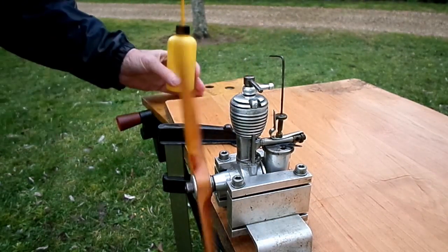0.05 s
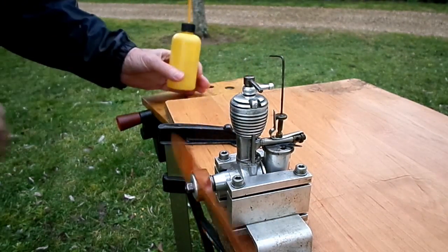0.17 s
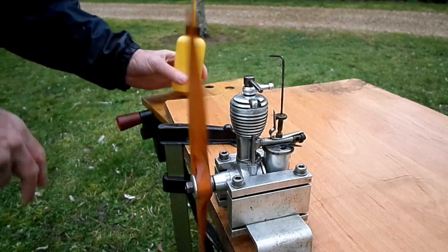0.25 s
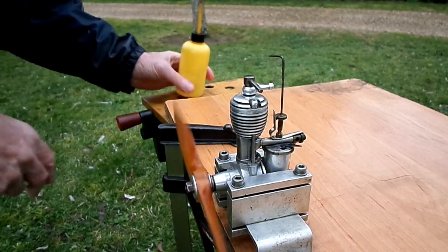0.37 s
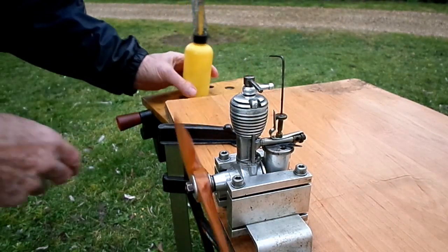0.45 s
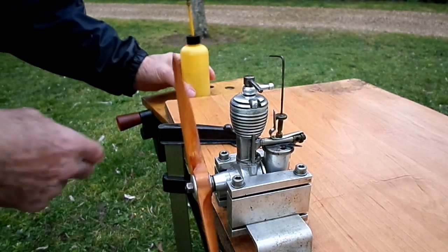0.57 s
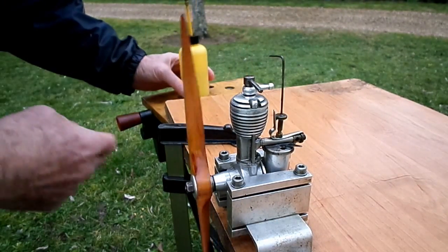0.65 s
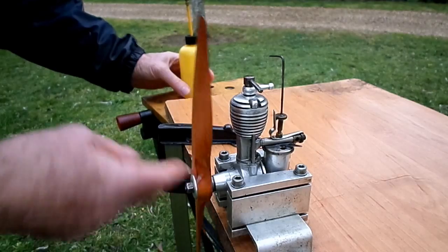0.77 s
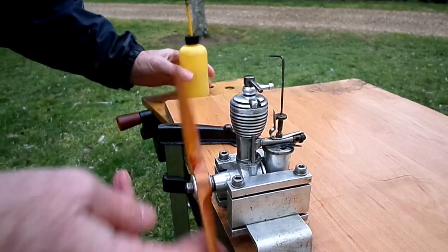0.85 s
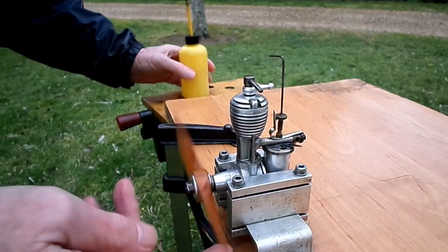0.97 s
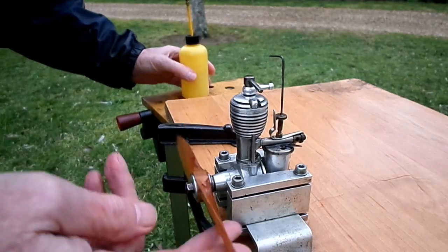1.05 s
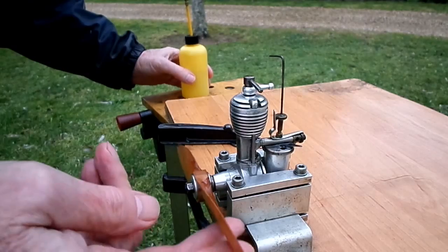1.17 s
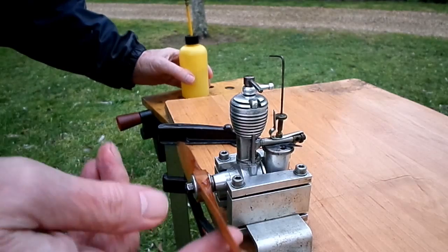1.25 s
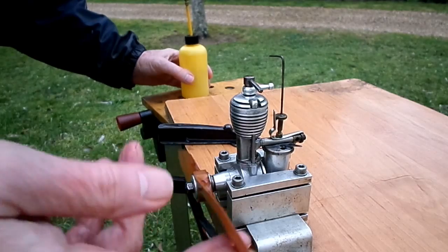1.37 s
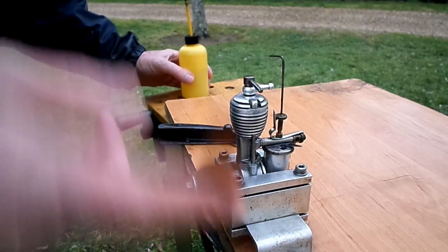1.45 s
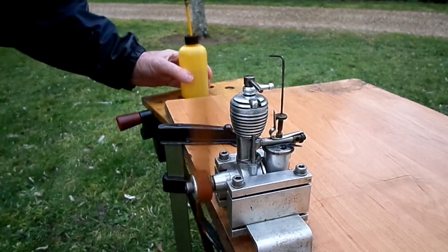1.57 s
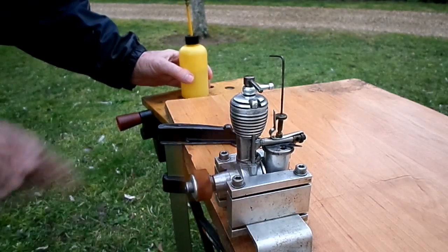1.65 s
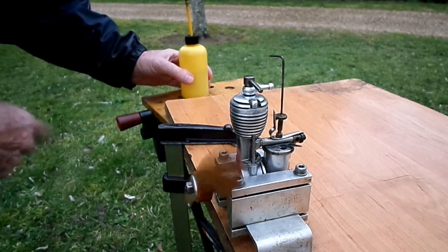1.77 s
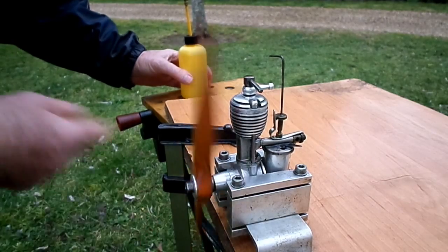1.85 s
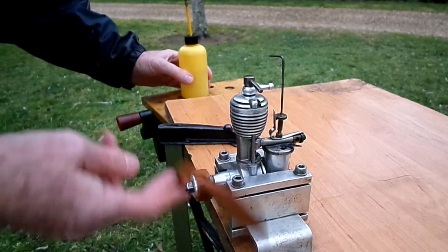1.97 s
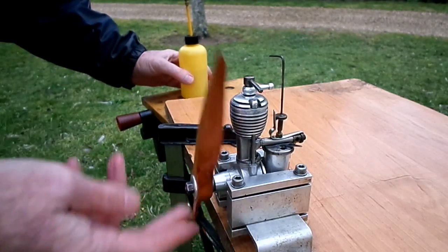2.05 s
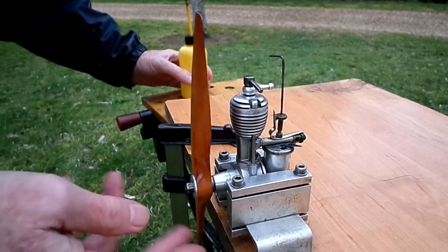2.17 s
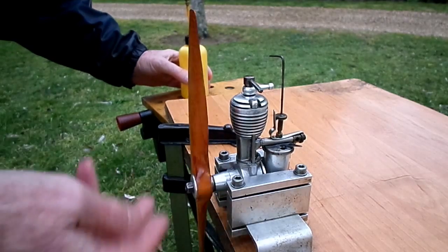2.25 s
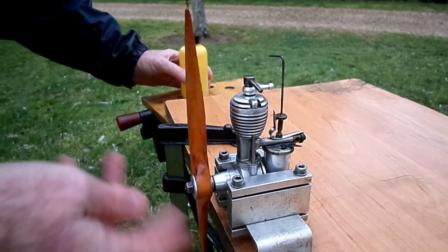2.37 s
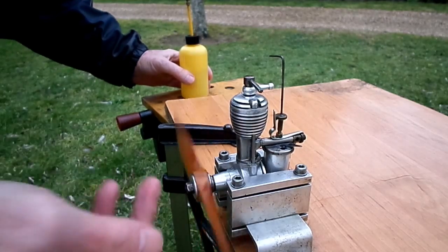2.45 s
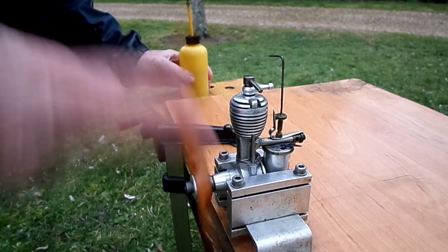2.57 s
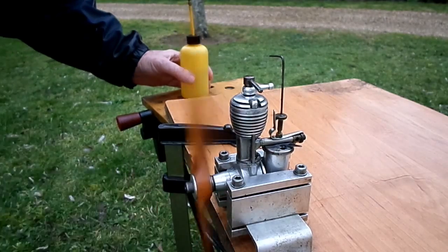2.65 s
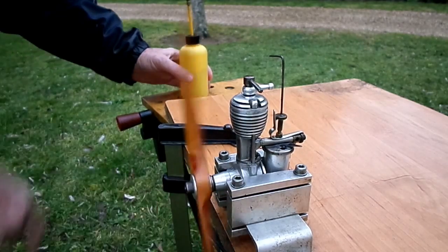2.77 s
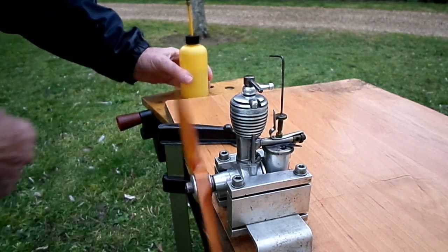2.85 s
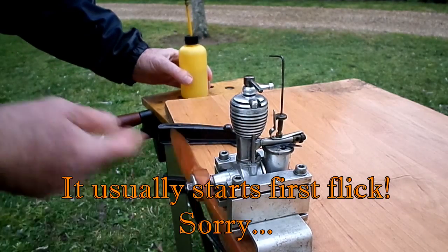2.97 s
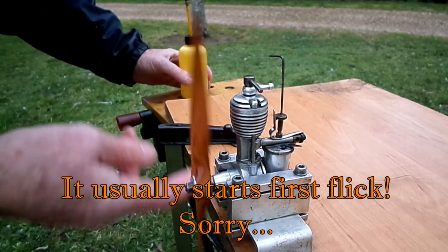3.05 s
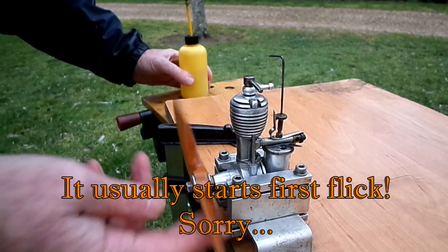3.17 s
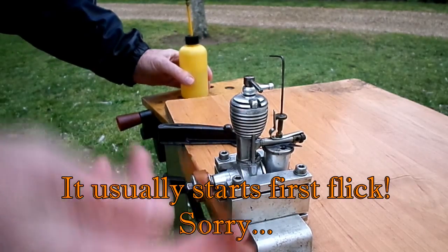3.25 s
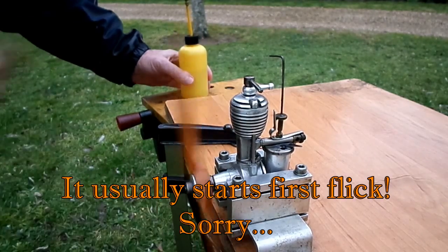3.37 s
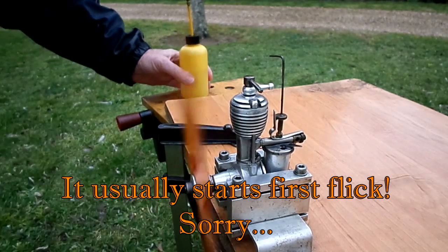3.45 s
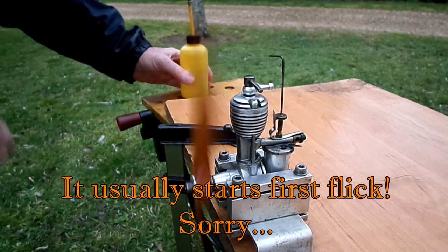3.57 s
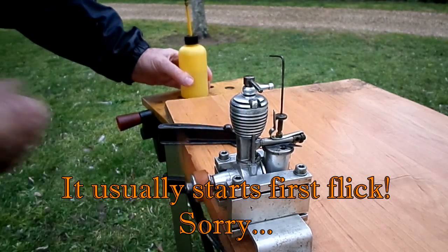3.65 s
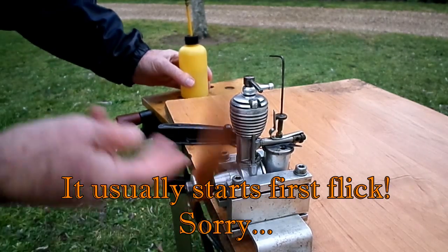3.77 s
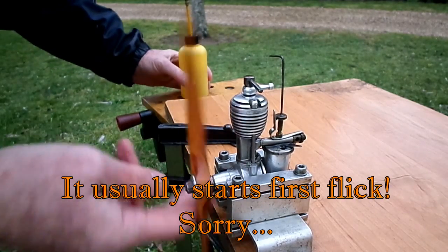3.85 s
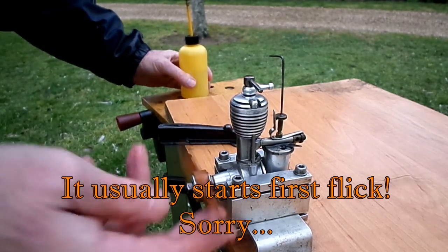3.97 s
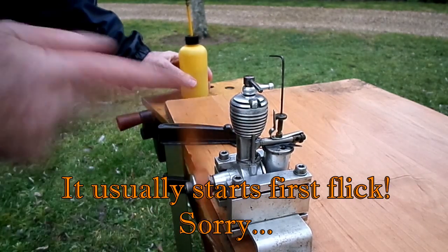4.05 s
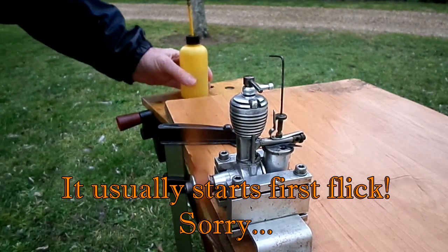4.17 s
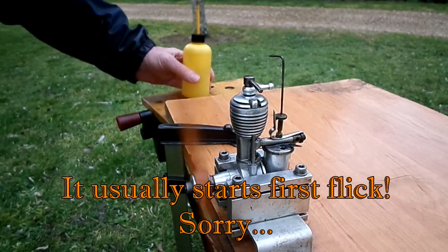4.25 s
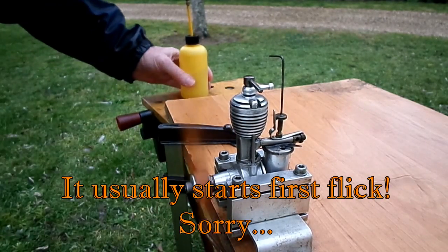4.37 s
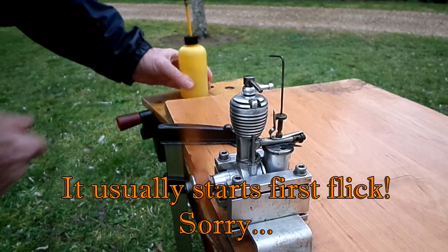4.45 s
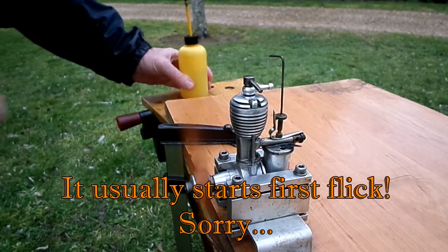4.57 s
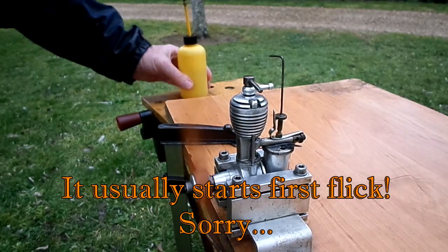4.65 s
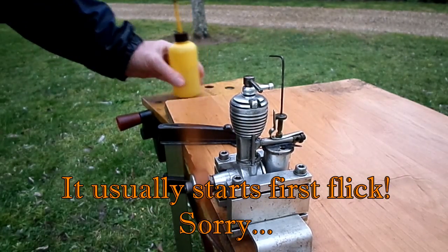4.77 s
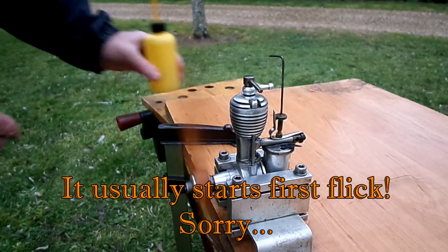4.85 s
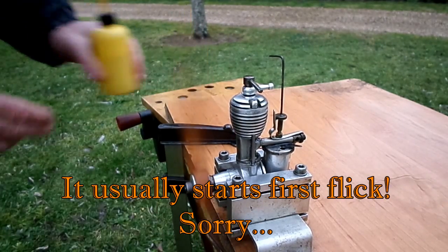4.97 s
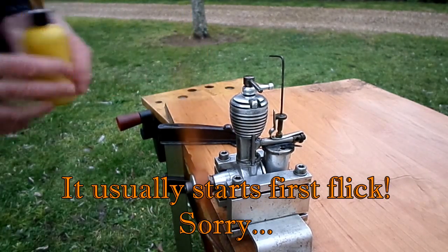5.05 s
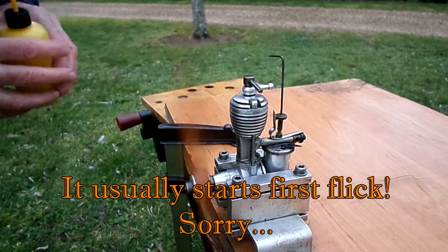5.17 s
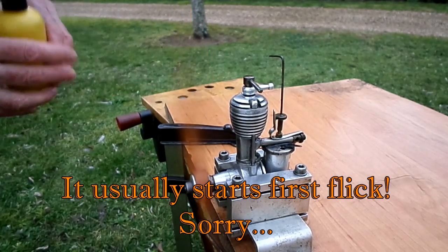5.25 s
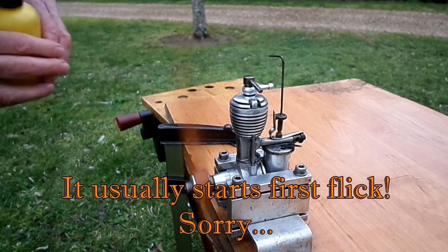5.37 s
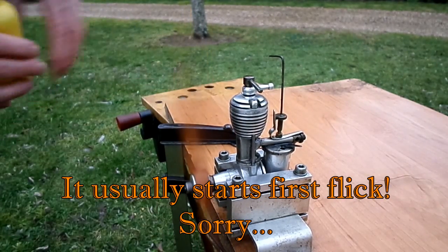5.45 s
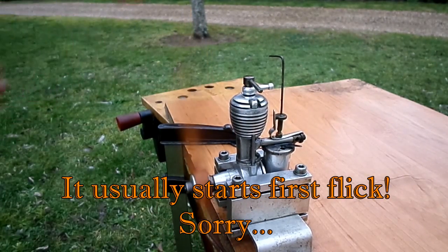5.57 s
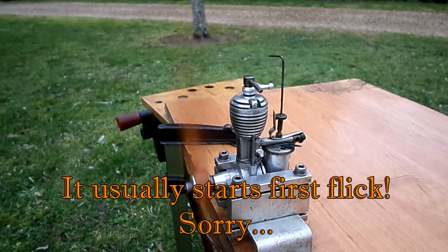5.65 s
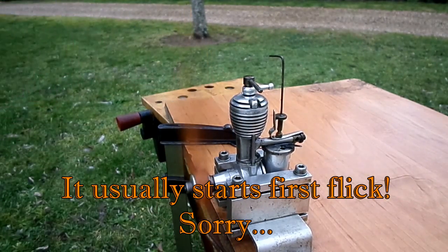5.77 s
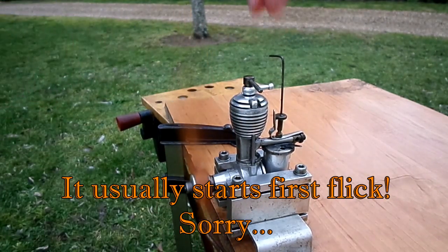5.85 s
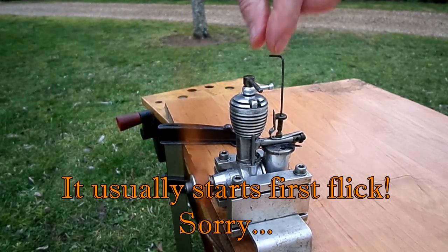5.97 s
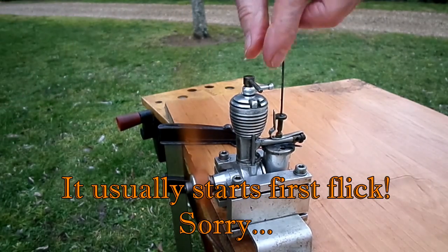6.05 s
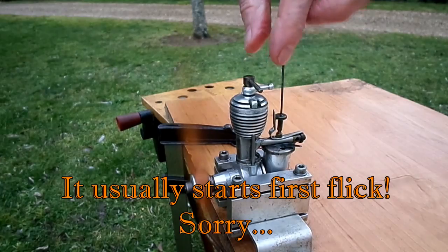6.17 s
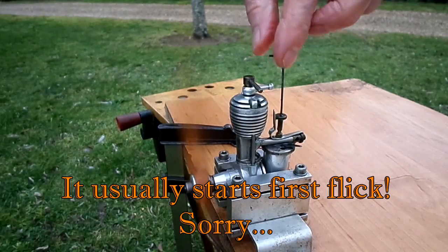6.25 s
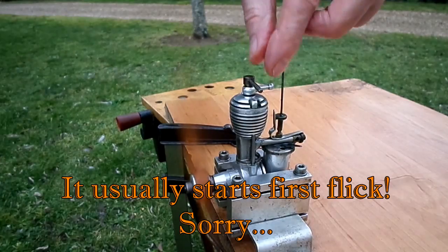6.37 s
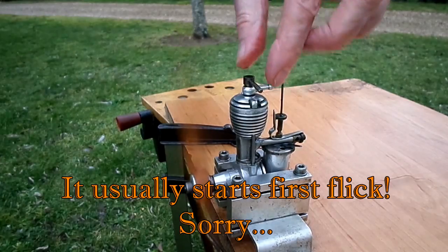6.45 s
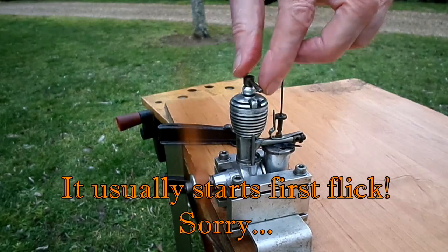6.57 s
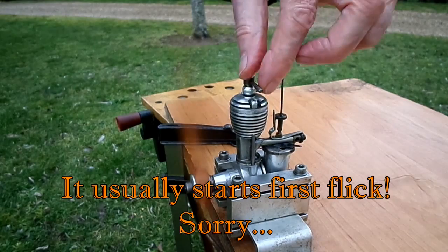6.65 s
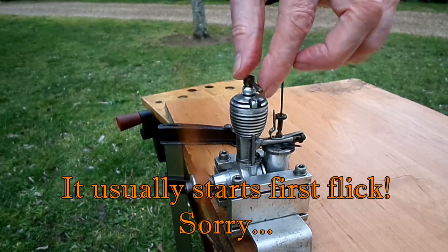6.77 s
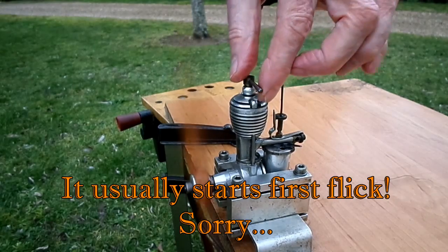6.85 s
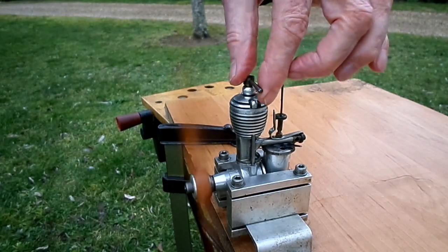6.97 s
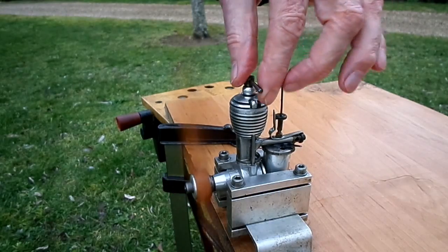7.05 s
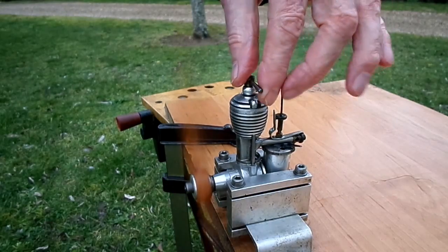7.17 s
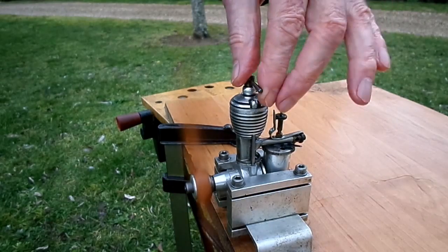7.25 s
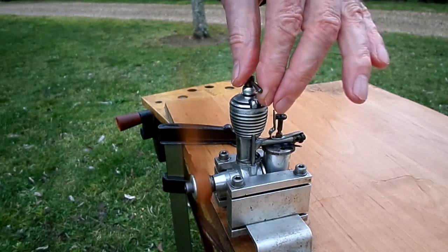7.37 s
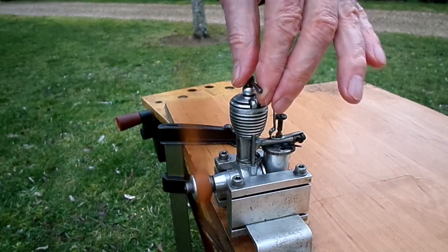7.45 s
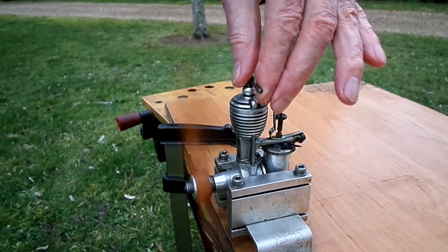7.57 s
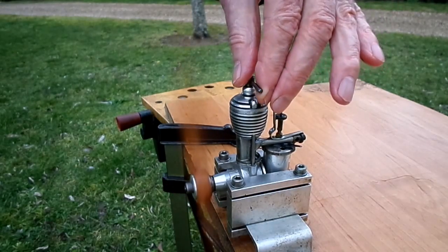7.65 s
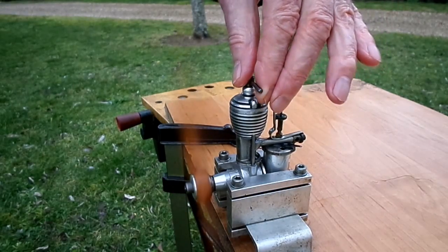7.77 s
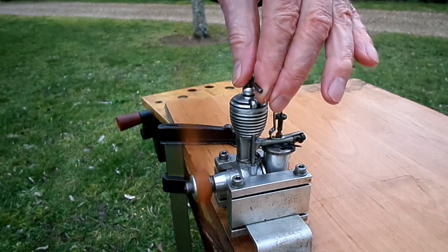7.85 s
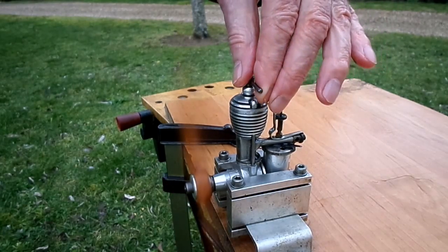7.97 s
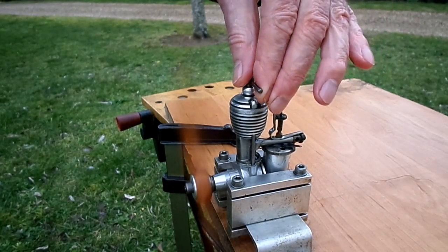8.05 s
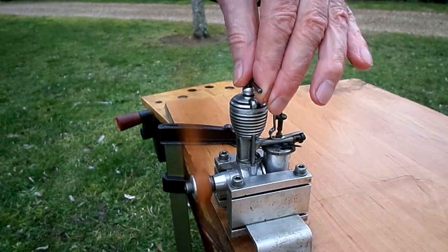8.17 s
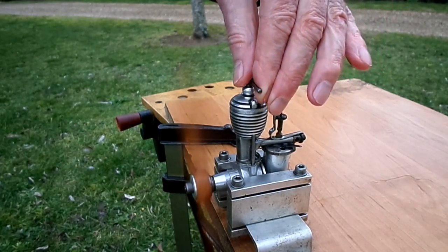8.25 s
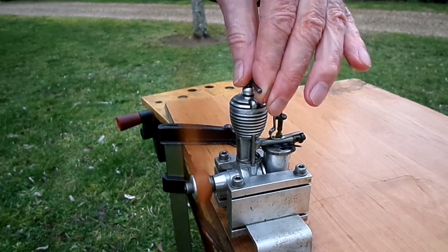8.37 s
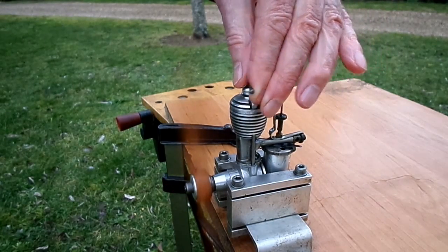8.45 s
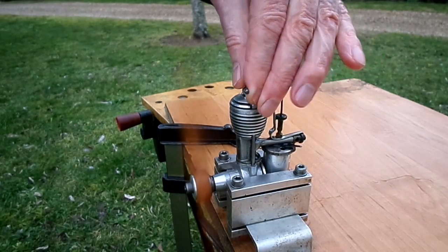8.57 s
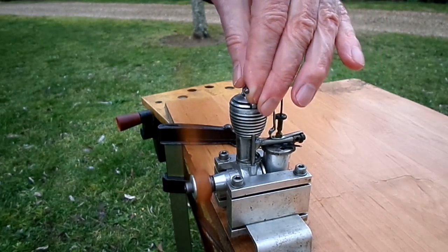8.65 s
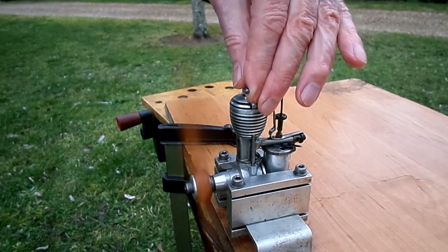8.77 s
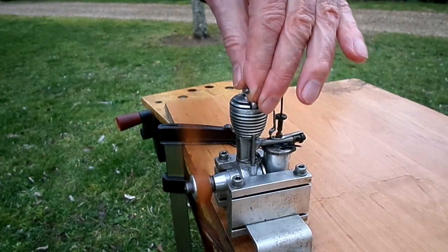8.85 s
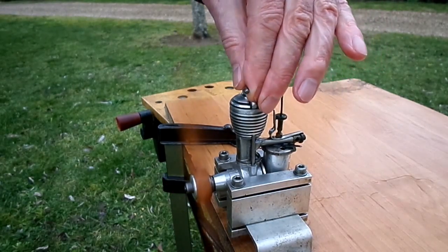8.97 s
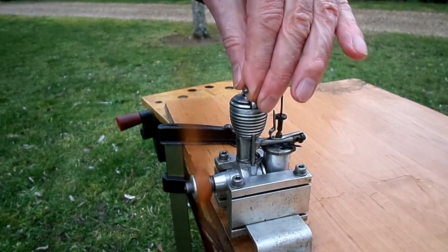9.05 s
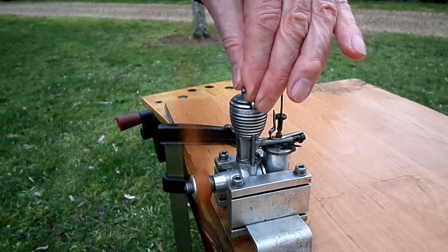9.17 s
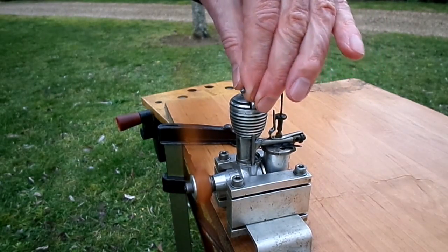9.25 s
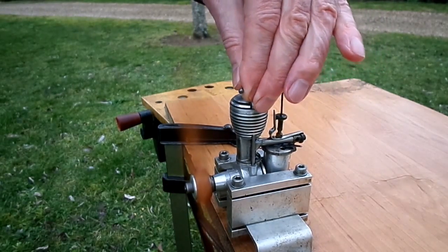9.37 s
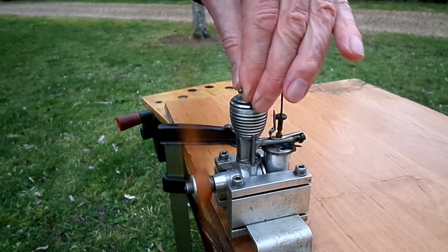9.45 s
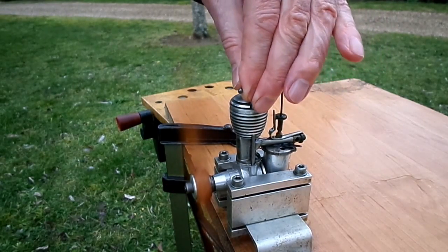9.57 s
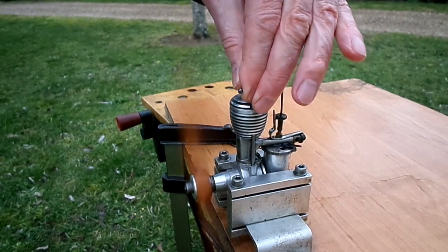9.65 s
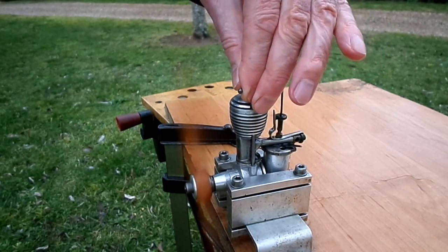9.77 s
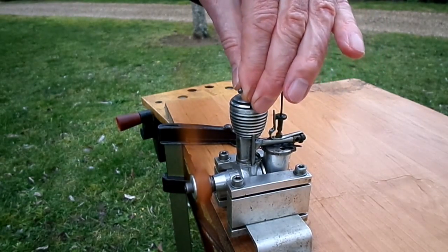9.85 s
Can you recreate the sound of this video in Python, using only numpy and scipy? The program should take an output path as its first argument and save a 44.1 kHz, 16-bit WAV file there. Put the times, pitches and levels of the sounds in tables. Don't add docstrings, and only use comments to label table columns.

```python
import sys
import numpy as np
from scipy import signal
from scipy.fft import rfft, irfft, next_fast_len
from scipy.io import wavfile
from scipy.ndimage import uniform_filter1d, map_coordinates

SR = 44100
rng = np.random.default_rng(int(sys.argv[2]) if len(sys.argv) > 2 else 0)


def unload_wav(signal):
    wavfile.write(
        sys.argv[1],
        SR,
        np.round(np.clip(np.atleast_2d(signal).T, -1, 1) * 32767).astype(np.int16),
    )


def gain_from_db(level_db):
    decades = np.asarray(level_db, float) / 20
    return 10 ** decades


N = 436590
TIME = np.arange(N) / SR

# t/s, speed/(turns per s)
SPEED = [(4.386, 41.33), (4.45, 51.6), (4.534, 73.08), (4.75, 82.32), (5.1, 90.5), (5.4, 95.21),
         (5.8, 95.39), (6.3, 93.54), (6.8, 96.3), (7.2, 89.28), (7.6, 93.37), (8.0, 91.51), (8.3, 87.95),
         (8.7, 96.35), (9.1, 94.13), (9.4, 98.44), (9.9, 99.45)]
# from/s, to/s, blast lost/dB, extra level of the firing that relights/dB
MISFIRES = [(4.755, 4.802, -16, 7.5), (5.812, 5.812, 0, 9.5), (6.108, 6.108, -8, 2.5),
            (6.383, 6.392, -21, 9), (6.584, 6.62, -8, 8), (6.788, 6.815, -6, 4), (6.914, 6.942, -21, 4),
            (7.169, 7.185, -3, 4), (7.268, 7.272, -10, -1), (7.296, 7.34, -20, 6.5),
            (7.368, 7.388, -8, 1.5), (7.42, 7.436, -15, 2.5), (7.455, 7.466, -15, 6),
            (7.642, 7.654, -7, 11), (7.671, 7.7, -15, 5), (7.911, 7.919, -9, 23), (7.953, 7.972, -21, 4),
            (8.005, 8.004, -3, -3), (8.078, 8.087, -11, 5), (8.15, 8.168, -16, 7.5), (8.25, 8.278, -27, 3),
            (8.404, 8.45, -20, 7), (8.807, 8.834, -17, 7.5), (9.132, 9.158, -7, 13.5),
            (9.169, 9.193, -5, 5), (9.629, 9.644, -11, 6.5), (9.88, 9.889, -17, 3)]
# t/s, blast/dB, ring/dB, hiss/dB
POPS = [
    (1.588, -17, -21, -20),
    (1.653, -31, -25, -19),
    (2.6567, -22, -18.5, -14.5),
    (3.4525, -22.5, -23.5, -17),
    (3.398, -19, -12, -15),
    (4.1374, -10, -3, -15),
    (4.171, -7, -12, -9),
    (4.197, -17.5, -11, -14),
    (4.2647, -11.5, -9, -13.5),
    (4.2971, -11, -6, -10),
]
# f/Hz, width/Hz, level/dB
CASTING = [(3050, 370, 7), (4550, 570, -11), (5060, 530, -2.5)]
# f/Hz, width/Hz, level/dB
ROD = [(780, 350, 14.5), (2320, 1200, -1), (5280, 460, 7.5), (7570, 300, 5.5)]
# f/Hz, width/Hz, level/dB
FINS = [(3467, 130, 2), (5730, 95, 6)]
# f/Hz, level/(dB per Hz)
JET = [(2650, -11), (4500, -7.5), (5930, -4), (6390, -17.5), (7850, -2), (8510, -1.5), (9180, -2),
       (11000, 4.5), (14800, -14), (15700, -31), (16400, -56)]


def running():
    # t/s, exhaust blast/dB
    burn = [(4.37, -4), (4.5, -1), (4.6, -8), (4.75, -7.5), (5.0, -8), (5.3, -10.5), (6.3, -9), (6.48, -13),
            (6.66, -8), (6.9, -10), (7.15, -11), (7.5, -9), (7.9, -11.5), (8.3, -15.5), (8.7, -10.5),
            (9.1, -10), (9.4, -12), (9.9, -9.5)]
    # t/s, fin ring/dB, fourth blade multiple/dB
    grip = [
        (4.4, -2, 0.5),
        (5.0, -17, -1),
        (5.5, 0, -2.5),
        (6.3, -12, -4),
        (7.0, -1, -5.5),
        (7.8, 0, -3),
        (8.6, 1, -1.5),
        (9.2, 3.5, 1.5),
        (9.9, 1, 1.5),
    ]
    spin, sag, near = crank()
    burn_db = curves(burn)[0]
    fin_db, fourth_db = curves(grip)
    wash_db = -14.5 - 10.5 + 0.65 * (burn_db + 13.0) - 0.23 * sag - 0.5 * near

    turns = np.cumsum(spin) / SR
    whole = np.arange(int(turns[-1]) + 1)
    s = np.interp(whole, turns, TIME) - .0005 + .00002 * rng.standard_normal(len(whole))
    s[0] = SPEED[0][0] - .0008
    period = 1 / np.interp(s, TIME, np.maximum(spin, 30))

    lost, clank = misfiring(s)
    scatter = rng.standard_normal((len(s), 3))
    blast_db = np.interp(s, TIME, burn_db - 0.39 * sag)
    hiss_db = np.interp(s, TIME, wash_db)
    size_db = blast_db + 1.15 * lost - .3 * np.maximum(lost, 0) + .9 * scatter[:, 0]

    blast = exhaust(s + 0.000414, size_db - 11.5)
    boom_db = size_db - 22 - 22 * np.clip(s - 4.9, 0, 1)
    blast += through(train(s + 0.00043, boom_db), modes([(823, 190, 0)]))

    on = np.clip((TIME - 4.3) / 0.18, 0, 1)
    wash = on * gain_from_db(wash_db + 3.8 * wobble(40))
    gas = port_gas(s, period, size_db, hiss_db, lost, scatter, wash)
    ring = head_ring(s, size_db, blast_db, hiss_db, fin_db, lost, scatter, wash)
    slack = rod_slack(s, period, blast_db + clank)
    return blast + ring + slack + gas + blade_hum(spin, sag, burn_db, turns, fourth_db)


def crank():
    sags = [17.5, 9.4, 3.8, 7.2, 14.1, 8.4, 2.0, 9.0, -1.0, 9.3, -2.9, 2.4, 2.3, 12.7, 0.7, 5.5, 5.1, 0.0,
            -0.6, 5.4, 0.1, 9.6, 2.9, 12.7, 1.3, 5.7, 0.1]
    early_s, late_s, recover_s, flare_s = .008, .005, .15, .055
    t = TIME[::32]
    sag, near = np.zeros(len(t)), np.zeros(len(t))
    for (start, end, *_), lost in zip(MISFIRES, sags):
        begin, stop = start - early_s, end + late_s
        fall = np.clip((t - begin) / (stop - begin), 0, 1)
        sag += lost * fall * np.exp(-np.maximum(t - stop, 0) / recover_s)
        near = np.maximum(near, (t < start) * np.exp(-np.abs(start - t) / flare_s))
    sag, near = np.interp(TIME, t, sag), np.interp(TIME, t, near)
    return (curves(SPEED)[0] - sag) * (TIME >= SPEED[0][0]), sag, near


def misfiring(s):
    # t/s, lost/dB, gain of the next one/dB
    weak = [
        (6.713, -5, 1.5),
        (7.034, -27, 2),
        (7.136, -21, 5),
        (7.147, 8, -2),
        (7.632, -2, 0),
        (7.824, -2, 2.5),
        (7.926, -3, -0.5),
        (8.047, -13, 5),
        (9.028, -32, 4),
        (9.405, -2, 0),
    ]
    cold_db, warm_db, warm_s = -3.5, -13.5, 0.11
    lost = np.zeros(len(s))
    clank = warm_db + (cold_db - warm_db) * np.exp(-((s - s[0]) / warm_s) ** 2)
    for start, end, lost_db, bang_db in MISFIRES:
        relight = np.searchsorted(s, end)
        lost[(s > start) & (s < end)] = lost_db
        lost[relight] = bang_db
        clank[relight] = .6 * bang_db - 4
    for at, lost_db, next_db in weak:
        k = np.argmin(np.abs(s - at))
        lost[k:k + 2] = lost_db, lost[k + 1] + next_db
    return lost, clank


def exhaust(s, db):
    # f/Hz, width/Hz, level/dB
    stub = [(1412, 1830, -1.3), (2274, 650, 0), (3197, 150, -13.5), (3945, 270, -4.3), (600, 200, -22),
            (946, 580, -5.9)]
    # delay/ms, share at each of path_s (minus = inverted)
    bounces = [(0, 1, 1, 1, 1), (.278, .57, .51, .57, .52), (.636, -.1, -.23, -.22, -.34),
               (.805, -.34, -.48, -.41, -.53), (1.025, .02, -.34, -.19, -.3), (1.21, .21, -.11, -.06, -.11),
               (1.392, .15, .03, .19, .16), (1.735, .2, .22, .26, .31), (1.833, -.25, -.22, -.2, -.33),
               (2.402, .18, .2, .27, .37), (2.667, .06, .12, .13, .19)]
    path_s = [4.7, 5.3, 7.0, 9.0]
    stray = .045 * rng.standard_normal((len(s), len(bounces)))
    paths = np.zeros(N)
    for k, (ms, *shares) in enumerate(bounces):
        paths += train(s + ms / 1000, db, np.interp(s, path_s, shares) + stray[:, k])
    return filtered(through(paths, modes(stub)), lambda hz: hz ** 6 / (hz ** 6 + 494.0 ** 6))


def port_gas(s, period, size_db, hiss_db, lost, scatter, wash):
    # f/Hz, level/(dB per Hz)
    churning = [(150, -0.5), (300, 2.5), (600, -1.5), (2000, 3), (4200, -2), (6500, -59), (9000, -48)]
    hiss = gust(s, hiss_db - 3.5 + 0.04 * lost + 2.2 * scatter[:, 1], rise=0.00065, t60=0.02)
    hiss += gust(s + 0.78 * period, hiss_db - 25 + 1.5 * scatter[:, 2], rise=0.00036, t60=0.024)
    churn = gust(s, size_db - 35, rise=.0007, t60=.012)
    jet = (hiss + gain_from_db(-22) * wash) * patchy(noise(JET), depth_db=1.6)
    return jet + (churn + gain_from_db(-18) * wash) * noise(churning)


def head_ring(s, size_db, blast_db, hiss_db, fin_db, lost, scatter, wash):
    # f/Hz, width/Hz, level/dB
    treble = [(8150, 870, -6), (9340, 410, -1), (10800, 180, 11)]
    sharper_db = 1.14 * np.maximum(lost, 0)
    ring = gust(s, hiss_db - 14 + 1.8 * scatter[:, 2], rise=0.00047, t60=.014) * rattle(CASTING)
    ring += through(train(s, size_db - 31 + np.interp(s, TIME, fin_db)), modes(FINS[1:]))
    ring += gain_from_db(fin_db - 22.0) * wash * rattle(FINS[1:])
    ring += through(train(s + 0.000842, blast_db - 28.0 + 1.8 * scatter[:, 1]), modes(FINS[:1]))
    edge = modes([(4900, 2400, -33.0), (5430, 260, 23.0), (6500, 1700, 14.0)])
    ring += through(train(s + 0.000514, size_db - 50.0 + sharper_db), edge)
    treble_db = hiss_db - 8.5 + sharper_db + 0.25 * lost + 0.42 * scatter[:, 0]
    return ring + reflected(through(train(s + 0.000511, treble_db), modes(treble)))


def rod_slack(s, period, db):
    # t/s, level/dB
    clanks = [(6.4129, -20), (6.639, -17.5), (7.204, -18), (7.4799, -18.5), (7.663, -12.5), (7.9817, -18),
              (8.1827, -23), (8.845, -22), (9.045, -17), (9.078, -19), (9.1659, -15)]
    late = (s + .68 * period)[:-1]
    slack = gust(late, (db - 16)[:-1], rise=.0012, t60=.022) * rattle(ROD)
    clank_s, clank_db = np.transpose(clanks)
    return slack + gust(clank_s, clank_db - 7.5, rise=0.00032, t60=0.015) * rattle(ROD[2:])


def blade_hum(spin, sag, burn_db, turns, fourth_db):
    # multiple of crank speed, level/dB
    blades = [(1, -13), (2, 8), (3, -12.5), (4, -2), (6, 2.5)]
    catch_s, catch_speed = 4.13, 32.2
    hum_db = -38 + 0.94 * np.minimum(burn_db + 8.0, 4.5)
    hum_db += 20 * 2.2 * np.log10(np.maximum(spin, 70) / 90)
    hum_db += -0.47 * sag - 5.5 * (spin == 0)
    angle = turns + catch_speed * np.minimum(TIME - SPEED[0][0], 0) + 0.283
    hum = np.zeros(N)
    for k, db in blades:
        level = gain_from_db(db + (k == 4) * fourth_db + 1.2 * wobble(8.0))
        level *= (np.maximum(spin, 80) / 90) ** (1.46 * (k % 5 - 2))
        hum += level * np.cos(2 * np.pi * k * angle)
    fade_in = np.clip((TIME - catch_s) / 0.018, 0, 1)
    return np.sqrt(2) * fade_in * gain_from_db(uniform_filter1d(hum_db, size=1500)) * hum


def flicking():
    # f/Hz, width/Hz, level/dB
    cold_exhaust = [(840, 360, 9.5), (2260, 260, 6.5), (3100, 700, 4), (4200, 310, 4)]
    # t/s, level/dB
    squeaks = [
        (2.628, -36),
        (2.686, -27),
        (2.772, -39),
        (3.4935, -29),
        (4.212, -26),
        (4.247, -30),
        (4.34, -29),
    ]
    # t/s, level/dB
    cold_knocks = [
        (4.161, -11),
        (4.289, -12.5),
        (4.378, -26),
        (4.403, -24),
    ]
    # t/s, level/dB
    snaps = [
        (1.62, -25),
        (1.5555, -33),
    ]
    s, thump_db, blast_db, ring_db, hiss_db = turned_over()
    fired = np.isin(s, np.transpose(POPS)[0, 4:])

    thump = through(train(s, thump_db + 3.5), modes([(266, 200, 17.4), (707, 850, 3.6)]))
    bang = train(s[fired] + 0.000967, blast_db[fired] + 0.49)
    bang = reflected(through(bang, modes(cold_exhaust)))
    pop = train(s[~fired] + 0.00141, blast_db[~fired] - 7.5)
    pop = lows_first(through(pop, modes([(704, 960, 7.0), (2390, 480, 4.0)])))
    hiss = gust(s - .0008, hiss_db - 3.5, rise=0.0017, t60=0.016) * noise(JET)

    slack = gust(s, blast_db - 9.0 - 8 * fired, rise=0.000092, t60=0.034) * rattle(ROD[:2])
    cold_rod = rattle([(875, 104, 7.5), (2180, 120, 1.5), (5150, 470, -7)])
    slack += gust(*np.transpose(cold_knocks), rise=0.0017, t60=0.016) * cold_rod
    slack += through(train(*np.transpose(snaps)), modes([(5600, 2900, -4.0), (6740, 500, -3)]))

    ring = gust(s + 0.00034, ring_db - 7.0 - 8 * fired, rise=0.00095, t60=0.019) * rattle(CASTING)
    fin_db = ring_db - 3 - 20 * fired - 10 * (blast_db > ring_db - 5) - 6 * (ring_db < hiss_db - 6)
    ring += through(train(s + 0.000794, fin_db), modes(FINS))
    ring += through(train(s[fired] + 0.00074, ring_db[fired] - 24), modes([(3220, 180, 0)]))
    ring += through(train(*np.transpose(squeaks)), modes([(6550, 230, 0.5)]))
    return thump + bang + pop + slack + ring + hiss


def turned_over():
    # t/s, hiss/dB, thump/dB
    puffs = [(0.0168, -32.5, -44), (0.039, -36, -65), (0.8788, -41.5, -48), (1.048, -37.5, -55),
             (1.555, -31, -53), (1.5737, -32, -43), (1.592, -19.5, -48), (1.6188, -21, -37),
             (1.7077, -32, -51), (2.019, -37, -71), (2.0241, -21.5, -71), (2.1952, -43, -59),
             (2.449, -48, -84), (2.5937, -36, -47), (2.6292, -27, -40), (2.644, -31, -54),
             (2.685, -23, -32.5), (2.7717, -31, -41.5), (2.807, -30, -43), (3.3173, -38, -61),
             (3.368, -30, -44), (3.3858, -22, -42), (3.421, -19, -32), (3.49, -26, -38), (3.688, -37, -48),
             (3.897, -33.5, -47), (3.914, -41, -52), (3.962, -45, -55), (4.0441, -31.5, -57)]
    # t/s, ring/dB, hiss/dB
    clinks = [(0.1115, -29.5, -25.5), (0.185, -48, -57), (0.286, -44, -38), (0.558, -49, -44.5),
              (1.748, -33.5, -33), (1.8752, -30.5, -26), (2.107, -48, -46), (2.7208, -19, -21),
              (2.929, -31, -25.5), (3.0924, -46, -40.5), (3.5266, -24.5, -23.5), (3.557, -56, -53),
              (3.59, -42, -39), (3.625, -39, -33.5), (3.755, -32.5, -28.5)]
    # t/s, level/dB
    taps = [(0.2731, -58), (0.4815, -39.5), (0.546, -60), (0.8572, -45), (0.9686, -39), (1.5795, -39),
            (1.647, -37), (3.4305, -28), (2.0247, -43), (2.083, -41.5), (3.8537, -18.5), (3.882, -44)]
    # t/s, hiss/dB, blast/dB
    catching = [(4.129, -21, -35), (4.1555, -16, -39), (4.184, -18, -28), (4.212, -21, -33),
                (4.2267, -16, -21), (4.247, -19, -42), (4.283, -21, -43), (4.311, -21, -25),
                (4.3234, -13, -18.5), (4.339, -22, -41), (4.354, -22, -25), (4.371, -18, -40)]
    rows = [(s, thump, thump - 23, hiss - 12, hiss) for s, hiss, thump in puffs]
    rows += [(s, ring - 17.5, ring - 9, ring, hiss) for s, ring, hiss in clinks]
    rows += [(s, db - 14, db, db - 20, db - 25) for s, db in taps]
    rows += [(s, -30, blast, ring, hiss) for s, blast, ring, hiss in POPS]
    rows += [(s, hiss - 15, blast, hiss - 13, hiss) for s, hiss, blast in catching]
    return np.transpose(rows)


def bench():
    # t/s, level/dB, hardness/(dB per octave)
    knocks = [
        (0.016, -42, 8),
        (0.8788, -43.5, -8),
        (2.0252, -45.5, 7),
        (3.8548, -35.5, 0),
    ]
    # f/Hz, level/dB, t60/s
    wood = [(331, 3.5, 0.19), (400, 2, 0.093), (510, 0, 0.12), (597, -10, 0.11), (762, 14.5, 0.038),
            (1000, -35, 0.027), (1230, -37, 0.04)]
    # t/s, level/dB
    ticks = [
        (0.274, -45.5),
        (0.5452, -49),
        (2.0804, -46.5),
        (3.092, -45),
        (3.879, -46),
    ]
    s, db, hard_db = np.transpose(knocks)
    t, out = np.arange(SR // 5) / SR, np.zeros(N)
    for hz, level_db, t60 in wood:
        ring = gain_from_db(level_db - 60 * t / t60) * np.sin(2 * np.pi * hz * t)
        out += through(train(s, db + hard_db * np.log2(hz / 600)), ring)
    thud = gust(s, db - 6.5, rise=0.0021, t60=0.086) * rattle([(450, 290, -12), (1110, 340, 0)])
    return out + thud + through(train(*np.transpose(ticks)), modes([(2310, 180, 0)]))


def air():
    # t/s, level/dB
    calm = [
        (0, -48),
        (4.05, -48),
        (4.7, -84),
        (9.9, -65),
    ]
    # t/s, level/dB, half width/s
    gusts = [
        (0, -56, 0.17),
        (1.02, -35.5, 0.081),
        (1.25, -36.5, 0.094),
        (2.0, -49, 0.11),
        (2.67, -47, 0.029),
        (3.548, -39, 0.03),
        (4.2, -44, 0.065),
    ]
    # f/Hz, level/(dB per Hz)
    rumble = [(12, -52), (20, 3.5), (66, -6), (216, -31), (242, -41), (300, -31), (390, -57), (660, -120)]
    # from/s, peak/s, to/s, swish/dB
    sweeps = [(0, 0.034, 0.2, -58), (1.495, 1.564, 1.74, -42), (1.724, 1.884, 2.3, -57.5),
              (2.04, 2.087, 1.75, -46), (1.992, 2.042, 2.1, -55), (2.436, 2.484, 2.5, -53),
              (2.573, 2.632, 2.79, -38.5), (2.767, 2.875, 3.25, -52), (3.324, 3.384, 3.47, -39),
              (3.422, 3.445, 3.567, -35.5), (3.576, 3.627, 3.84, -51), (4.035, 4.05, 4.57, -47),
              (4.067, 4.108, 4.2, -46), (4.15, 4.183, 4.25, -32.5)]
    # f/Hz, level/(dB per Hz)
    swish = [(100, 12.5), (250, 5), (700, -1), (1500, -4), (3000, -8), (6000, -33), (9000, -40)]
    # f/Hz, level/(dB per Hz)
    lawn = [(59, -36), (100, -4), (220, -6.5), (361, -12), (647, -13), (2000, -23), (2460, -23.5),
            (6000, -33), (7800, -60), (13200, -120)]
    # f/Hz, level/(dB per Hz)
    leaking = [(1760, -54), (3000, -9.5), (5140, -9.5), (5560, -9), (8450, -7), (10500, 0), (15000, -12.5),
               (15800, -27), (16400, -61.5)]
    # lawn/dB, high hiss/dB
    still = (-57, -60.5)
    wind = gain_from_db(curves(calm)[0])
    for s, db, width in gusts:
        wind = wind + gain_from_db(db) * np.exp(-((TIME - s) / width) ** 2)
    buffet = wind * unit(gain_from_db(3.7 * wobble(23.2)) * noise(rumble))
    sweep = np.zeros(N)
    for start, peak, end, db in sweeps:
        sweep += gain_from_db(db) * np.interp(TIME, [start, peak, end], [0, 1, 0]) ** 0.84
    blade = sweep * gain_from_db(2.5 * wobble(60)) * noise(swish)
    grass = gain_from_db(still[0]) * gain_from_db(1.9 * wobble(5.7)) * noise(lawn)
    leak = (gain_from_db(still[1]) + sweep) * gain_from_db(1.8 * wobble(40)) * patchy(noise(leaking), depth_db=2.0)
    return buffet + blade + grass + leak


def reflected(x):
    # delay/s, level/dB
    echoes = [
        (.000325, -6.5),
        (.00054, -13),
        (.0027, -32),
        (.0045, -28.5),
    ]

    def response(hz):
        copies = np.prod([1 + gain_from_db(db) * np.exp(-2j * np.pi * hz * s) for s, db in echoes], axis=0)
        return copies * (1j * hz / (330 + 1j * hz)) ** 2

    return lows_first(filtered(x, response))


def lows_first(x):
    lead_s, below_hz = .0027, 930
    return filtered(x, lambda hz: np.exp(2j * np.pi * lead_s * below_hz * np.tanh(hz / below_hz)))


def unit(x):
    return x / np.sqrt(np.mean(x ** 2) + 1e-20)


def curves(rows, s=TIME):
    t, *cols = np.transpose(rows)
    return [np.interp(s, t, c) for c in cols]


def wobble(rate):
    return map_coordinates(rng.standard_normal(int(N * rate / SR) + 4), [TIME * rate])


def filtered(x, response):
    m = next_fast_len(len(x) + 8192)
    return irfft(rfft(x, m) * response(np.fft.rfftfreq(m, 1 / SR)), m)[:len(x)]


def noise(spectrum):
    f, db = np.transpose(spectrum)
    colour = lambda hz: gain_from_db(np.interp(np.log(hz + 1), np.log(f), db))
    return unit(filtered(rng.standard_normal(N), colour))


def modes(table):
    def ring(f):
        total = 0
        for k, (c, w, db) in enumerate(table):
            total = total + (-1) ** k * gain_from_db(db) * 1j * f * w / (c * c - f * f + 1j * f * w)
        return total

    shape = filtered(np.eye(1, 2048)[0], ring)
    return shape / np.linalg.norm(shape) * np.sqrt(SR / 200)


def train(s, db, share=1):
    at = np.asarray(s)[:, None] * SR
    taps = np.floor(at).astype(int) + np.arange(-7, 9)
    shape = np.sinc(taps - at) * np.cos(np.pi * (taps - at) / 18) ** 2
    return np.bincount(taps.ravel(), ((gain_from_db(db) * share)[:, None] * shape).ravel(), N + 16)[:N]


def through(x, shape):
    return signal.oaconvolve(x, shape)[:N]


def gust(s, db, rise, t60):
    t = np.arange(2048) / SR
    shape = gain_from_db(-60 * t / t60) * (1 - np.exp(-t / rise)) ** 2
    return through(train(s, db), shape / np.linalg.norm(shape) * np.sqrt(SR / 200))


def rattle(table):
    return unit(through(rng.standard_normal(N), modes(table)))


def patchy(x, depth_db):
    z = signal.stft(x, nperseg=512)[2]
    field = uniform_filter1d(rng.standard_normal(z.shape), size=8, axis=0)
    field = uniform_filter1d(field, size=12, axis=1)
    return unit(signal.istft(z * gain_from_db(depth_db * unit(field)), nperseg=512)[1][:N])


def scene():
    near = running() + flicking() + bench()
    t = np.arange(SR // 8) / SR
    tail = rng.standard_normal(len(t)) * gain_from_db(-60 * t / 0.013)
    garden = gain_from_db(-21) * through(near, tail / np.linalg.norm(tail))
    return (near + garden + air())[None]


def roll_off(x):
    return signal.sosfilt(signal.butter(12, 15900, fs=SR, output="sos"), x)


def record(dry):
    soft = dry / (1 + np.abs(dry / .98) ** 4) ** (1 / 4)
    mix = filtered(soft[0], lambda hz: 1 / np.sqrt(1 + (hz / 15500) ** 60))[None]
    return roll_off(mix)


dry = scene()
out = record(dry)
unload_wav(out)
```